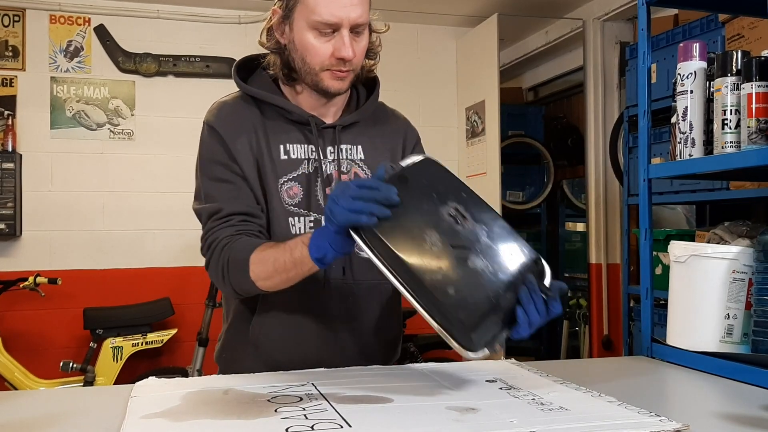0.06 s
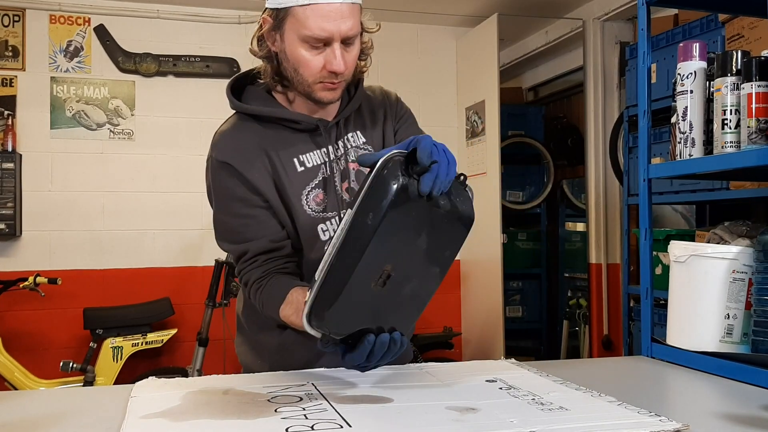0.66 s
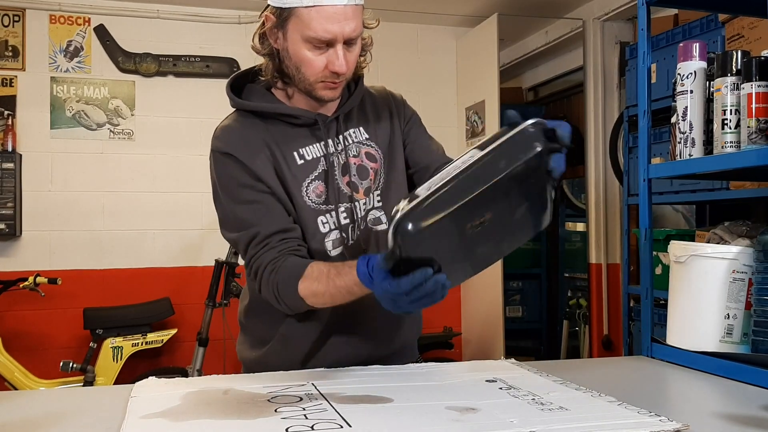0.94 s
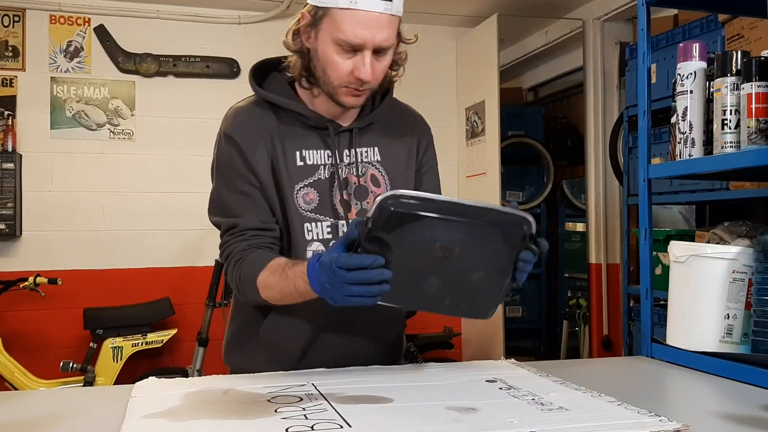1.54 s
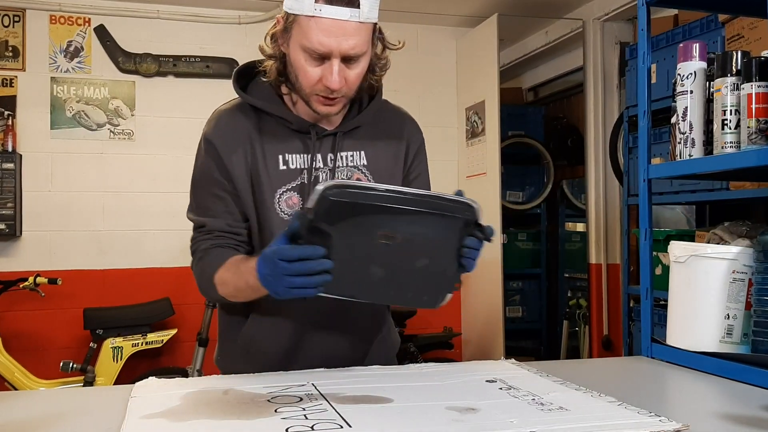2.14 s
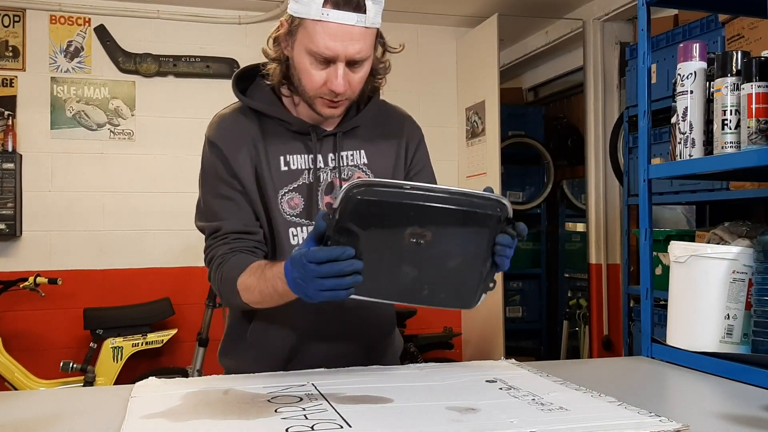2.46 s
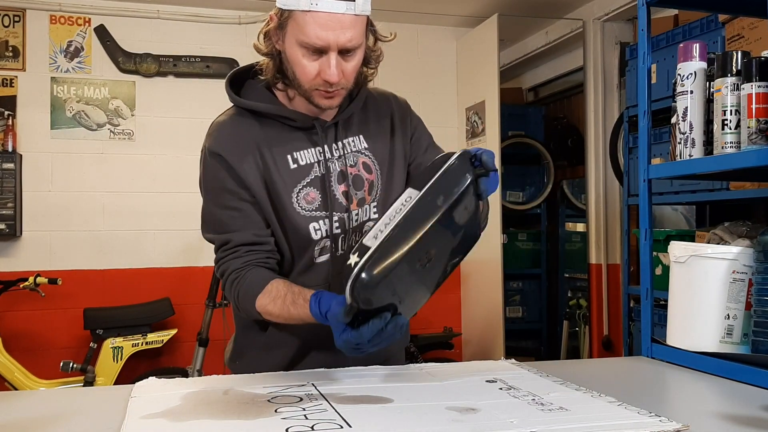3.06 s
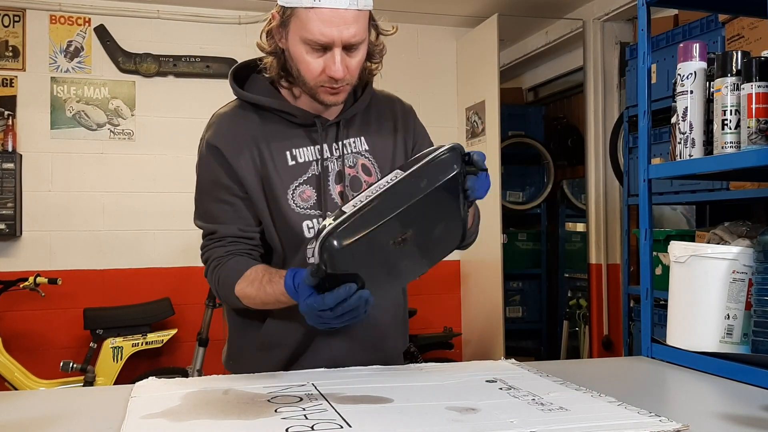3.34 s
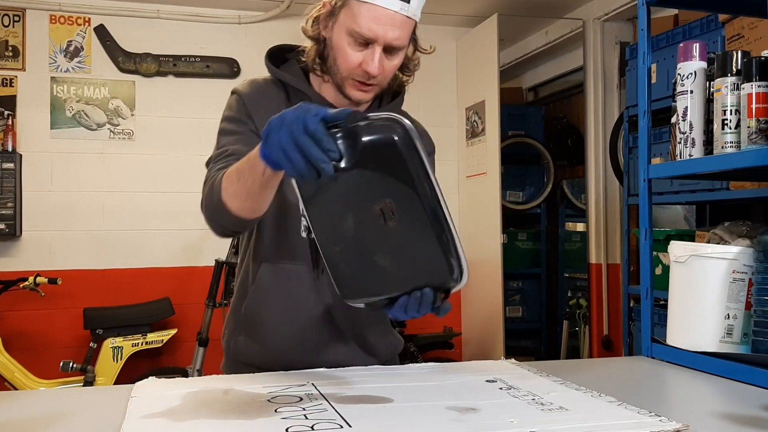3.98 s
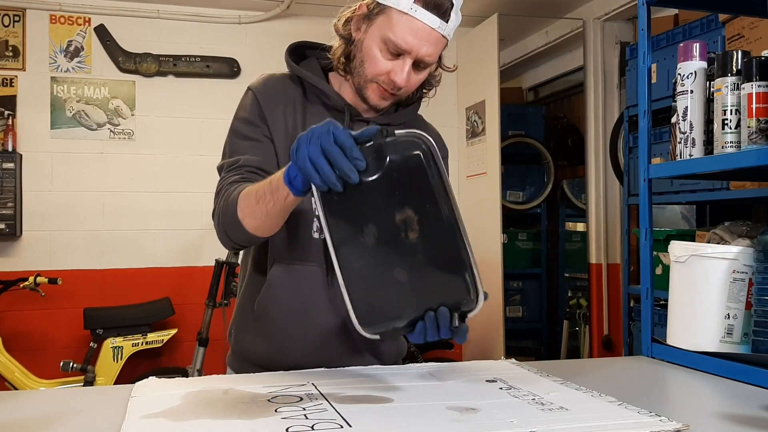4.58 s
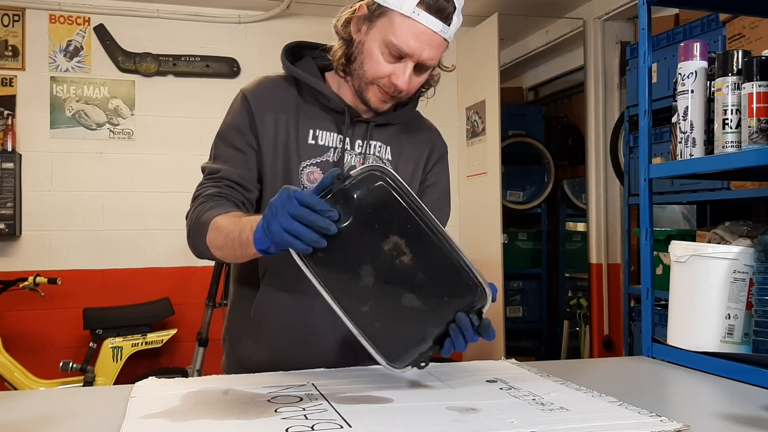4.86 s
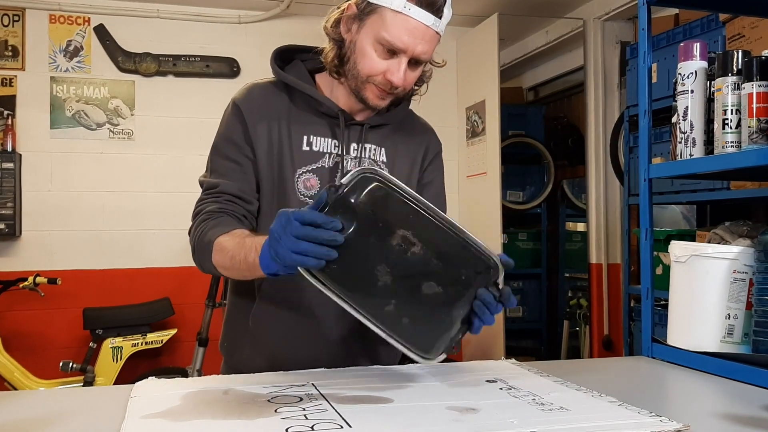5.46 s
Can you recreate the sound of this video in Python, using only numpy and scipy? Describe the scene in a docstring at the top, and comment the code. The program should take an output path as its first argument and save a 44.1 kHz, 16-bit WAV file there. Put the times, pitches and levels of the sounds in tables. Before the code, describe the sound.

Loose nuts, washers and screws clatter inside a small steel tank from the start and for the whole five and a half seconds. Swing after swing, the heap slides into a wall as a shower of tiny hits, with rolling, clinks, clanks and very high pings in between. The steel shell rings and gives hollow booms, and the workshop adds a short echo. A faint low hum swells and fades around 0.4 seconds, as the rattle briefly thins. At about 0.8 seconds the heap lands hard with a soft thud, and some later landings thud lightly too. Further strong surges come near 1.7, 2.4, 2.8 and 3.3 seconds. From 4.2 to 5.2 seconds small washers jingle faintly on one high note beneath the continuing clatter, while the hollow booms come more often. Another loud crash of parts arrives at about 5.5 seconds.

```python
"""Loose nuts, washers and screws are shaken and tipped inside a small steel tank in a workshop.
From the start and throughout, the heap pours against a wall swing after swing as a shower of tiny hits,
amid rolling, clinks, hard hits, booms, clanks and high pings. The steel rings; the room adds a short tail.
A faint low hum swells and fades early on, and from 0.8 s some landings thud.
Near the end, from 4.2 to 5.2 s, small washers jingle faintly on one high note."""
import sys
import numpy as np
from scipy import signal
from scipy.fft import rfft, irfft, next_fast_len
from scipy.io import wavfile

SR = 44100
rng = np.random.default_rng(int(sys.argv[2]) if len(sys.argv) > 2 else 0)


def transcribe(u):
    """Save the signal u as a 16-bit wav file named by the first command-line argument.

    u: samples, shape (n,) or (channels, n), limited to [-1, 1]; the rate is SR.
    q: integer samples, one column per channel.
    """
    v = np.clip(np.atleast_2d(u).T, -1, 1)
    q = np.round(v * 32767).astype(np.int16)
    wavfile.write(sys.argv[1], SR, q)


N = 247380
FFT_SIZE = next_fast_len(N + SR)
HZ = np.fft.rfftfreq(FFT_SIZE, 1 / SR)
TIME = np.arange(N) / SR

# Levels in all tables are relative. Weight boosts the lows, hardness the treble, fizz the very top.
# single hard hits on the wall: t/s, level/dB, weight/dB, hardness/dB
HARD_HITS = [(0.0375, -31, -1, -20), (0.0736, -26, -4, -15), (0.0873, -17, -17, -12),
             (0.1321, -15, -14, -8), (0.1674, -13.5, -20, -4), (0.1842, -11, -20, 5),
             (0.3718, -19, -20, -20), (0.4031, -23.5, -26, -13), (0.5985, -22.5, -13, -10),
             (0.648, -20.5, -13, -41), (0.6724, -13.5, -7.5, -11.5), (0.7377, -21.5, -3, -19),
             (0.7834, -11.5, -38, 6), (0.8121, -9.5, -22, 0), (0.85, -11, -17, -9), (1.237, -28, -10, -9),
             (1.3002, -20.5, -22, -5), (1.438, -19, -14.5, -9), (1.607, -15.5, -24, -8),
             (1.6539, -10.5, -17, -3), (1.6693, -11, -21, 1), (1.7075, -12, -10, 1), (1.827, -14, 3, 6),
             (1.886, -9.5, -16, -22), (2.173, -17, -15, -3), (2.243, -20, -15, -1), (2.392, -14, -20, -2),
             (2.4112, -8, -30, -5), (2.5803, -17, -17, -4), (2.599, -8.5, -12, 1), (2.7749, -15, -18, -8),
             (2.7874, -8.5, -5.5, -7.5), (3.112, -21, -20, -6), (3.1373, -14.5, -8.5, -6),
             (3.149, -16.5, -10, -7), (3.243, -12, -16, -9), (3.2622, -5, -11, -9.5),
             (3.392, -12.5, -29, -4.5), (3.5073, -14.5, -12, -8.5), (3.5293, -12, -12.5, -7.5),
             (3.7565, -15.5, -14, -10), (3.786, -12, -17, -4), (3.826, -20, -6, 8),
             (4.0256, -20.5, -25, 15), (4.0422, -18.5, -14, -2), (4.0769, -16, -38, -2.5),
             (4.1133, -15, -14, 0), (4.175, -13.5, -17, -9.5), (4.277, -12.5, -21.5, -7),
             (4.3175, -13, -22, -3), (4.5002, -19.5, -9, -15), (4.547, -17.5, -10, -7),
             (4.5831, -19.5, -9, -16), (4.6255, -17, -26, -17), (4.6539, -10.5, -22, 10),
             (4.733, -16.5, 5, -12), (4.7645, -16.5, -26, -7), (4.8638, -32, -15, -4),
             (4.8793, -14, -21, -5), (5.0916, -19.5, -14, -10), (5.204, -16, -33, 11),
             (5.2248, -15.5, -17, -6), (5.4, -25.5, -8, -13), (5.4161, -16, -19, -8),
             (5.5136, -10, -8, -3.5), (5.5225, -7, -27, 0.5), (5.539, -14, -17, 14)]
# how alike left and right sound: f/Hz, likeness (1 = the same)
STEREO_LIKENESS = [(60, 0.57), (300, 0.86), (470, 0.84), (750, 0.61), (1200, 0.13), (2500, 0.26),
                   (5000, 0.019), (9000, 0.005)]


def amp(db):
    """Turns decibels into a gain."""
    return 10 ** (np.asarray(db) / 20)


def read(points, hz):
    """Looks up a value between the rows of a table of f/Hz, value."""
    f, value = np.transpose(points)
    return np.interp(np.log(hz + 1), np.log(f + 1), value)


def unit(x):
    """Scales each channel to energy 1."""
    return x / np.sqrt(np.sum(x ** 2, -1, keepdims=True) + 1e-20)


def add(mix, s, sound):
    """Mixes a sound in at s seconds."""
    part = mix[..., max(round(s * SR), 0):][..., :sound.shape[-1]]
    part += sound[..., :part.shape[-1]]


def stereo(left, other, hz):
    """Blends two unrelated sounds into a partly alike left and right."""
    same = np.clip(read(STEREO_LIKENESS, hz), -1, 1)
    return np.array([left, same * left + np.sqrt(1 - same ** 2) * other])


def contact(weight_db, hardness_db, fizz_db):
    """Gains of four bands (low, middle, treble, top): heavy parts push the lows, short hits the highs."""
    return amp([weight_db, 0 * weight_db, hardness_db, fizz_db])


def heap_power(roll_weight_db=-8.5, roll_fizz_db=-3.5, settle_db_per_s=143.5):
    """Power fed to the wall in four bands: steady rolling, plus pours that speed up, land and settle."""
    # stray parts rolling over the tank floor: t/s, level/dB, hardness/dB
    rolling = [(0, -32.5, -3), (0.39, -41, 4), (0.49, -53, 3.5), (0.597, -54, -6), (0.61, -36, -7),
               (1.03, -45, -7), (1.12, -38.5, 4), (1.44, -38.5, -1.5), (1.55, -42, -2), (2.1, -35, -5.5),
               (2.2, -37, 3), (3.02, -34, -4.5), (3.09, -39, 2), (3.2, -33, -3), (3.62, -36, -22),
               (3.89, -36.5, -16), (4.01, -46, 4), (4.1, -34.5, -2), (4.45, -37.5, -1.5), (4.8, -35, -11),
               (5.15, -38, 0), (5.6, -35.5, -16)]
    # the heap sliding into a wall: landing t/s, run-up/s, level/dB, weight/dB, hardness/dB, fizz/dB
    pours = [(0.129, 0.024, -31, -7, -13, -21), (0.191, 0.017, -28, -9, 5.5, -4),
             (0.801, 0.067, -25, -5, 1.5, -1.5), (1.242, 0.11, -31, -7, -9, -8),
             (1.709, 0.06, -27.5, -7, 5, 2.5), (1.923, 0.07, -28, -8, 0.5, -2.5),
             (2.15, 0.024, -38.5, -6.5, 4, 6.5), (2.279, 0.036, -36, -1, 11.5, 7.5),
             (2.44, 0.061, -24.5, -8.5, -3, -14), (2.509, 0.046, -30.5, -6.5, -19, -20),
             (2.67, 0.06, -34, -3.5, 7, 5), (2.867, 0.05, -23.5, -7, 0, -5.5),
             (3.294, 0.018, -26, -4.5, 0, -2.5), (3.41, 0.015, -35.5, -34, 6, 5),
             (3.529, 0.014, -25.5, -40, -9, -11), (3.689, 0.034, -35, -6, 3.5, 0.5),
             (3.811, 0.035, -27.5, -10.5, -2.5, -4.5), (4.2, 0.079, -33, -4, -5, 1),
             (4.308, 0.05, -27, -3.5, 4.5, -2), (4.671, 0.054, -29.5, -2, 7, 4),
             (4.75, 0.013, -33, -4, 3, -7), (4.97, 0.08, -34, -1.5, 12, 7),
             (5.251, 0.049, -28.5, -5.5, 5, 0.5), (5.44, 0.028, -29, -13, -11, -8),
             (5.544, 0.025, -22, -9.5, 3.5, 2.5)]
    times, *columns = np.transpose(rolling)
    roll_db, roll_hardness = (np.interp(TIME, times, c) for c in columns)
    roll_bands = contact(np.full(N, roll_weight_db), roll_hardness, roll_hardness + roll_fizz_db)
    power = (amp(roll_db) * roll_bands) ** 2
    for s, run_up, db, weight, hardness, fizz in pours:
        gather = np.exp(-.5 * (np.minimum(TIME - s, 0) / run_up) ** 2)
        settle = amp(db - settle_db_per_s * np.maximum(TIME - s, 0))
        power += np.outer(contact(weight, hardness, fizz), gather * settle) ** 2
    return power


def airborne(flight_s=0.018, soft_db=-10.0, depth=2):
    """Just before the hardest hits the parts are in the air, so the level dips."""
    dip_db = np.zeros(N)
    for s, db, *_ in HARD_HITS:
        add(dip_db, s - flight_s, np.full(round(flight_s * SR), depth * min(soft_db - db, 0)))
    return amp(dip_db)


def shower(per_s=290, crowding=.45, spread_db=3, level_db=-1.0, jitter=2.5):
    """Forces of the many tiny hits in four bands; a faster slide brings more and harder ones."""
    power = heap_power()
    rate = per_s * (power[1] / power[1].mean()) ** crowding
    hits_so_far = np.cumsum(rate) / SR
    late, strength, side = rng.standard_normal((8000, 3)).T
    at = np.searchsorted(hits_so_far, np.arange(len(late)) + jitter * np.tanh(late) / 2)
    size = amp(spread_db * np.clip(strength, -2, 2)) * np.sign(side)
    force = np.bincount(at, size / size.std() * (at > 0), N)[:N]
    return amp(level_db) * force * np.sqrt(power * SR / rate) * airborne()


def cracks(force, crack_s=0.0026, crack_db=-3.7):
    """Every hit opens with a short crack of noise, no two alike."""
    fade = np.exp(-2 / (crack_s * SR))
    power = signal.lfilter([1 - fade], [1, -fade], force ** 2 + 1e-20)
    return amp(crack_db) * np.sqrt(power) * rng.standard_normal((2, 1, N))


def causal(gain):
    """Adds the phase that makes a note ring only after the hit."""
    cepstrum = irfft(np.log(gain), FFT_SIZE)
    return gain * np.exp(2j * rfft(cepstrum[:FFT_SIZE // 2], FFT_SIZE).imag)


def shell_colour():
    """The tone of the steel shell, cut into four bands of equal energy."""
    # broad tone of the struck shell: f/Hz, level/dB
    broad_tone = [(40, -35.5), (130, -28.5), (230, -22), (330, -16.5), (420, -7.5), (1000, -0.5), (1800, 1),
                  (3000, 4.5), (4400, 4.5), (5400, 8), (7800, 6.5), (8800, -8.5), (11000, -3.5),
                  (15800, -8.5)]
    # its strongest notes: f/Hz, width/Hz, lift/dB
    strong_notes = [(226, 14.04, 5), (275.3, 8.6, 7.5), (362, 7.8, 3.5), (460, 16, 7.5), (486, 26, 3),
                    (707, 15, 4), (845, 5.5, 7), (1485, 370, 6), (2050, 210, 4), (2200, 390, 3),
                    (13500, 600, 4.5)]
    lift_db = sum(db / (1 + (2 * (HZ - hz) / width) ** 2) for hz, width, db in strong_notes)
    below = [1 / (1 + (HZ / hz) ** steep) for hz, steep in ((950, 5), (3800, 6), (8400, 24))]
    bands = np.diff([0 * HZ, *below, 1 + 0 * HZ], axis=0) * causal(amp(read(broad_tone, HZ) + lift_db))
    return bands / np.sqrt(np.mean(abs(bands) ** 2, 1, keepdims=True))


def spot_colour(spots, patchy_db=6.5, patch_hz=160, even_above_hz=4000):
    """Each spot of the wall favours its own notes, less so in the treble where notes crowd."""
    bumps = rng.standard_normal((spots, 400))
    depth_db = patchy_db / np.sqrt(1 + (HZ / even_above_hz) ** 2)
    gain = amp([depth_db * np.interp(HZ / patch_hz, np.arange(len(row)), row) for row in bumps])
    return gain / np.sqrt(np.mean(gain ** 2, 0))


def dying(fade_times):
    """A second of noise stands for countless ringing notes, each band fading at its own speed."""
    hz, t, noise = signal.stft(rng.standard_normal((2, SR)), SR, nperseg=256)
    faded = noise * amp(-60 * t / read(fade_times, hz)[:, None])
    return unit(signal.istft(faded, SR, nperseg=256)[1][:, :SR])


def wall_response(ring_db=-4, room_db=-7.5, room_rise_s=0.009):
    """Spectrum of what follows a hit on one spot: the ringing shell, then the room."""
    # how long the shell rings: f/Hz, t60/s (time to fade by 60 dB)
    shell_fade = [(250, 0.17), (500, 0.24), (2000, 0.25), (6000, 0.19), (15000, 0.25)]
    # how long the workshop echoes: f/Hz, t60/s
    room_fade = [(150, 0.23), (800, 0.67), (3000, 0.8), (7000, 0.49), (15000, 0.34)]
    t = np.arange(SR) / SR
    room = unit(dying(room_fade) * (1 - np.exp(-(t / room_rise_s) ** 2)))
    return rfft(amp(ring_db) * dying(shell_fade) + amp(room_db) * room, FFT_SIZE)


def tank(force, spots=9):
    """Each part lands on a random spot of the wall, so the ring keeps shifting."""
    # how much louder the left side is: f/Hz, left minus right/dB
    balance = [(300, -1.2), (1100, -1), (1550, -2), (2400, -0.9), (4500, -1), (7300, -2.5), (8700, 3),
               (11000, 0), (15000, 0.5)]
    spot = rng.integers(0, spots, N)
    colour = shell_colour()
    sound = (rfft(cracks(force), FFT_SIZE) * colour).sum(1)
    for k, favoured in enumerate(spot_colour(spots)):
        blows = (rfft(force * (spot == k), FFT_SIZE) * colour).sum(0)
        sound += blows * favoured * wall_response()
    side_gain = amp(np.outer([.5, -.5], read(balance, HZ)))
    return irfft(stereo(*sound, HZ) * side_gain, FFT_SIZE)[:, :N]


def lifted(x, hz, width_hz, db):
    """Turns one band up or down; its pitch and gain may change over time."""
    turn = np.exp(2j * np.pi * np.cumsum(hz * np.ones(N)) / SR)
    fade = np.exp(-np.pi * width_hz / SR)
    band = signal.lfilter([1 - fade], [1, -fade], x * (amp(db) - 1) / turn + 1e-18)
    return x + 2 * (turn * band).real


def panels(x, boom_hz=462, wander_hz=17, shifts_per_s=17):
    """As the heap presses on different parts of the wall, three rings swell and fade; the lowest wanders."""
    # lift of the tank's three rings: t/s, low boom/dB, middle ring/dB, hollow ring/dB
    ring_lifts = [(0.1, -3, 1, 2), (0.3, 2, 3, -3), (0.75, 0, -2.5, 4), (1.0, -5, -3, 5.5),
                  (1.25, -3, 2.5, 0), (1.65, 6.5, -0.5, 2.5), (1.95, 9, 1, 1), (2.25, -3.5, 3, -8),
                  (2.45, 6, 1, 5), (2.65, -2, 1, 1), (2.85, 6, -1, 3), (3.05, -4, 1, 1.5), (3.27, 9, 0, 4),
                  (3.6, -2, 1, -3), (3.83, 0, 2, 3.5), (4.12, -5, 3, 5), (4.32, 0.5, 0, 0),
                  (4.45, 6, 0, -15), (4.65, 1, 0, -8), (4.83, 3, 3, -9), (4.9, 1, 2, 8), (5.1, 0, -4, -5),
                  (5.25, 2, 0.5, 4), (5.38, -2, 0, 3.5), (5.6, -6, -3.5, -3)]
    times, *columns = np.transpose(ring_lifts)
    boom_db, middle_db, hollow_db = (np.interp(TIME, times, c) for c in columns)
    wander = np.interp(TIME * shifts_per_s, np.arange(200), rng.standard_normal(200))
    x = lifted(x, boom_hz + wander_hz * wander, width_hz=26, db=boom_db)
    x = lifted(x, hz=1400, width_hz=490, db=middle_db)
    return lifted(x, hz=2030, width_hz=69, db=hollow_db)


def ringing(rows, t60, detune, rise_cycles, tones):
    """Each row (t/s, level/dB, f/Hz) rings a few close tones, which beat together and shimmer."""
    out, t = np.zeros((2, N)), np.arange(SR // 3) / SR
    decay = amp(-60 * t / t60)
    for s, db, hz in rows:
        offsets = rng.standard_normal((tones, 1))
        pitches = hz * (1 + detune * (offsets - offsets.mean()))
        left, other = np.sin(2 * np.pi * (pitches * t + rng.random((2, tones, 1)))).sum(1)
        swell = 1 - np.exp(-(t * hz / rise_cycles) ** 2)
        ring = unit(stereo(left, other, hz) * swell * decay)
        add(out, s, amp(db) * ring * np.linalg.norm(decay) / np.sqrt(2))
    return out


def clinks(per_s=45, level_db=-4, spread_db=2.5, low_hz=900, high_hz=7800):
    """Parts bounce off the sliding heap and clink briefly, each at its own pitch."""
    power = heap_power()[1:3].sum(0) * airborne() ** 2
    gap, pitch, strength = rng.random((1200, 3)).T
    times = np.cumsum(2 * gap) / per_s
    db = level_db + 10 * np.log10(np.interp(times, TIME, power)) + spread_db * (4 * strength - 2)
    rows = np.transpose([times, db, low_hz * (high_hz / low_hz) ** pitch])
    return ringing(rows[times < TIME[-1]], t60=0.11, detune=0.004, rise_cycles=2, tones=2)


def strikes(level_db=17.0, weight_db=3, hardness_db=8, bounce_s=.004, bounce_gain=0.61, touches=3):
    """Forces of the hard hits in four bands; each nut chatters briefly as it settles."""
    force = np.zeros((4, N))
    all_gaps = rng.uniform(0.46, 2, (len(HARD_HITS), touches))
    for (s, db, weight, hardness), gaps in zip(HARD_HITS, all_gaps):
        treble_db = hardness + hardness_db
        bands = contact(weight + weight_db, treble_db, fizz_db=1.5 * treble_db - 6)
        blow = amp(db + level_db) * unit(bands)
        for k, delay in enumerate(bounce_s * (np.cumsum(gaps) - gaps[0])):
            add(force, s + delay, blow[:, None] * bounce_gain ** k)
    return force


def booms(level_db=1):
    """The heap leans on the tank's broad face, which booms on its lowest note."""
    # hollow booms of that face: t/s, level/dB, f/Hz
    boom_notes = [(0.075, -31, 495), (0.735, -30, 452), (1.14, -40, 470), (2.145, -39, 467),
                  (2.84, -33, 449), (3.505, -38, 466), (3.805, -32, 455), (4.055, -39, 460),
                  (4.13, -40.5, 455.6), (4.612, -28, 462.3), (4.722, -35, 471.5), (4.915, -29.5, 460),
                  (4.955, -36, 482.2), (5.243, -26.5, 464.3), (5.315, -33, 480.6), (5.505, -29, 453.4),
                  (5.548, -32.5, 470)]
    return amp(level_db) * ringing(boom_notes, t60=0.29, detune=0.0095, rise_cycles=4.2, tones=3)


def clanks():
    """A heavy nut catches one panel, which rings out above the clatter."""
    # struck panels: t/s, level/dB, f/Hz
    clank_notes = [(0.087, -26, 888), (0.132, -24.5, 913), (0.673, -29.5, 391), (0.696, -25, 1496),
                   (0.79, -24, 1595), (1.827, -20.5, 1417), (1.886, -29.5, 699), (2.372, -26.5, 861),
                   (2.6, -30, 2126), (2.788, -25, 2350), (2.787, -26, 1006), (2.875, -23.5, 1490),
                   (3.137, -28, 2150), (3.142, -27, 1108), (3.2615, -23, 2050), (3.2615, -22, 2300),
                   (3.2615, -25, 1078), (3.266, -22, 1401), (3.31, -25, 1524), (3.325, -24, 2099),
                   (3.53, -36, 1043), (3.70, -28, 1065), (3.81, -35, 2179), (4.21, -31.5, 665),
                   (4.734, -30, 888.3), (4.732, -31, 744), (4.88, -30, 2042), (5.414, -32.5, 762.3),
                   (5.555, -31, 2040)]
    return ringing(clank_notes, t60=0.25, detune=0.025, rise_cycles=3, tones=6)


def pings(level_db=-5):
    """A nut or washer flies free and rings on its own high note."""
    # free-flying parts: t/s, level/dB, f/Hz
    ping_notes = [(0.12, -33, 14350), (0.257, -30, 14600), (0.332, -26, 14500), (0.645, -36, 15400),
                  (1.147, -26.5, 14100), (1.70, -18, 13800), (2.268, -25, 14380), (2.466, -26, 14300),
                  (3.122, -25, 14250), (3.158, -30, 14290), (3.232, -25, 14280), (3.391, -20, 5373),
                  (3.912, -28, 14510), (4.113, -15, 14670), (4.305, -27, 14250), (4.689, -22, 14140),
                  (4.965, -16.5, 5610), (5.4165, -16, 14170)]
    return amp(level_db) * ringing(ping_notes, t60=0.28, detune=.018, rise_cycles=8, tones=28)


def hum(hz=49, peak_s=0.44, peak_db=-62, swell_db_per_s=28, fade_db_per_s=38):
    """A faint low tone swells and fades away."""
    db = peak_db - np.maximum(swell_db_per_s * (peak_s - TIME), fade_db_per_s * (TIME - peak_s))
    return amp(db) * np.sqrt(2) * np.sin(2 * np.pi * hz * TIME)


def thuds(level_db=-9, low_hz=54, upper_hz=90, rise_s=0.0062, left_lag_s=0.0026):
    """The whole heap lands and the tank thuds softly in the hands."""
    # heavy landings: t/s, level/dB
    landings = [(0.785, -33), (1.701, -47), (2.43, -63), (3.262, -51), (4.651, -43), (5.54, -43)]
    out, t = np.zeros((2, N)), np.arange(SR // 4) / SR
    tone = np.sin(2 * np.pi * low_hz * t) + np.sin(2 * np.pi * upper_hz * t)
    push = t / rise_s * np.exp(1 - t / rise_s) * tone
    for s, db in landings:
        add(out[0], s + left_lag_s, amp(db + level_db) * push)
        add(out[1], s, amp(db + level_db) * push)
    return out


def jingle(start_s=4.2, end_s=5.2, hz=14250, level_db=-36, taps=36):
    """While the tank stands on end, small washers tap the wall and shimmer on one high note."""
    times = np.interp(np.arange(taps) + rng.random(taps), [0, taps], [start_s, end_s])
    rows = [(s, level_db, hz) for s in times]
    return ringing(rows, t60=0.072, detune=0.005804, rise_cycles=30, tones=4)


def scene():
    """The shower and the hard hits ring the tank; the other sounds are added on top."""
    clatter = panels(tank(shower() + strikes()))
    return clatter + clinks() + booms() + clanks() + pings() + hum() + thuds() + jingle()


def record(dry):
    """Steeply cuts off the very highest treble."""
    low_pass = signal.firwin(511, cutoff=15900, window=("kaiser", 9), fs=SR)
    return signal.oaconvolve(dry, low_pass[None], "same", axes=1)


dry = scene()
out = record(dry)
transcribe(out)
```